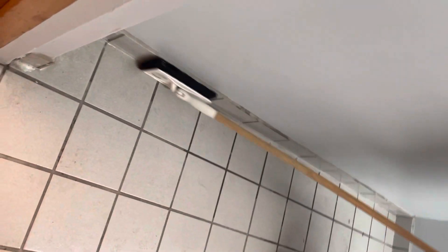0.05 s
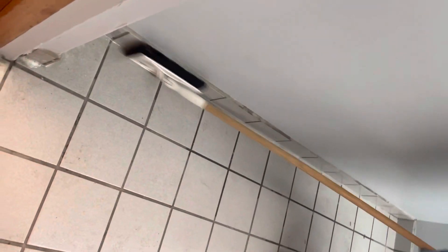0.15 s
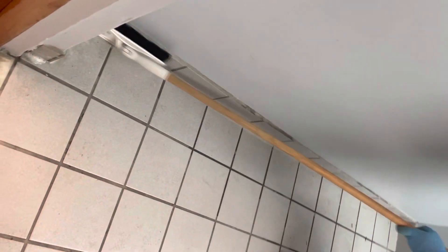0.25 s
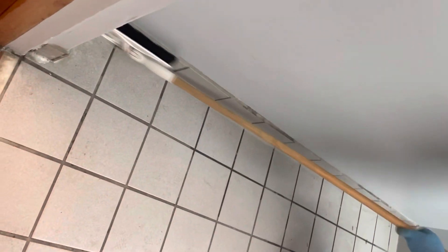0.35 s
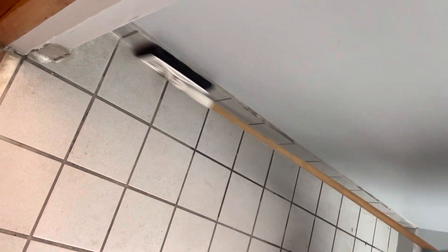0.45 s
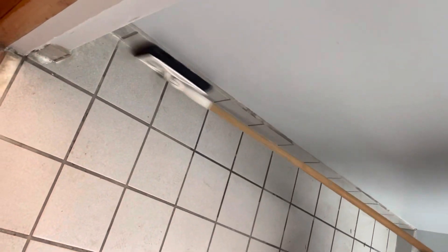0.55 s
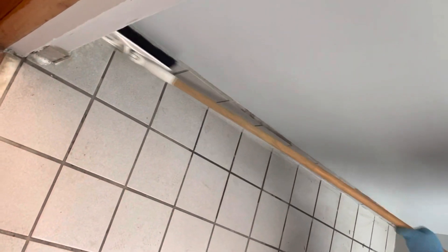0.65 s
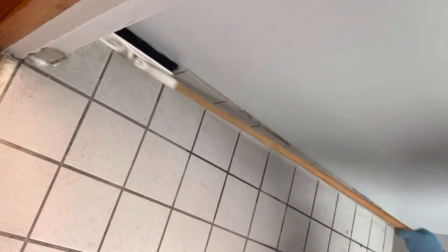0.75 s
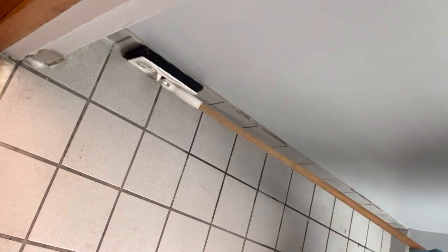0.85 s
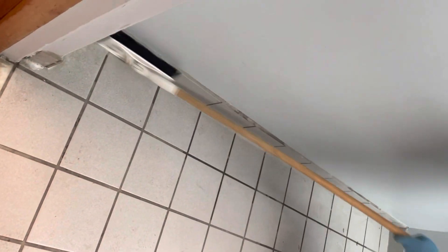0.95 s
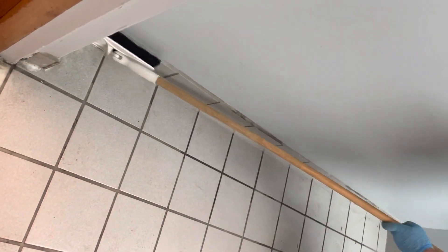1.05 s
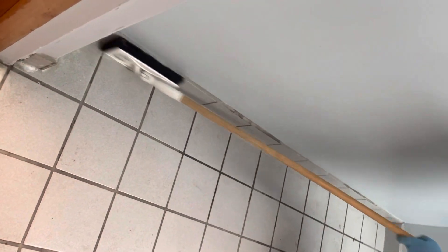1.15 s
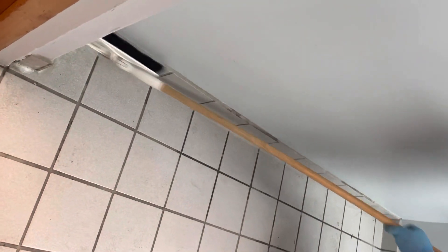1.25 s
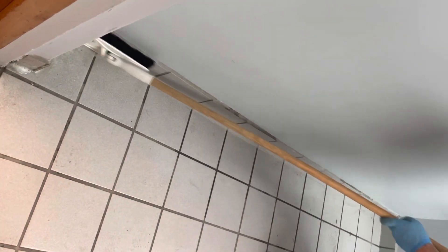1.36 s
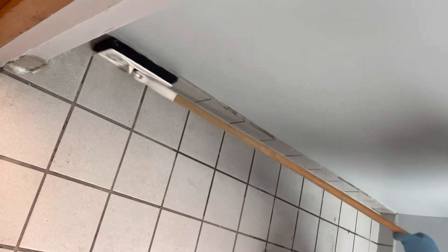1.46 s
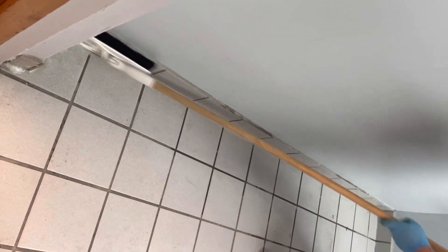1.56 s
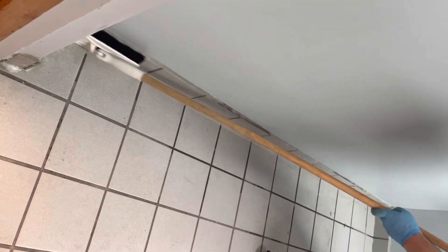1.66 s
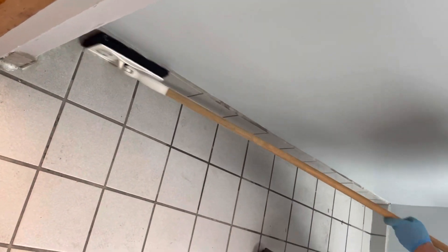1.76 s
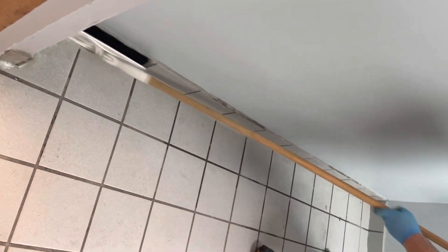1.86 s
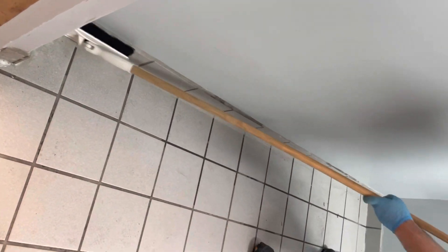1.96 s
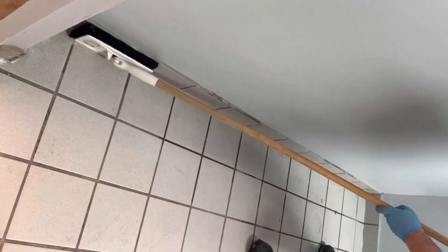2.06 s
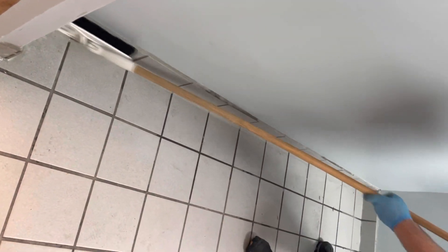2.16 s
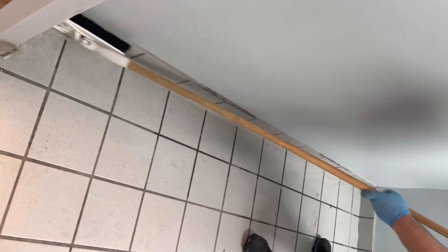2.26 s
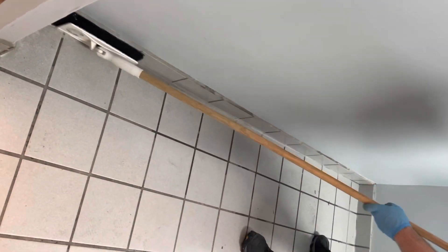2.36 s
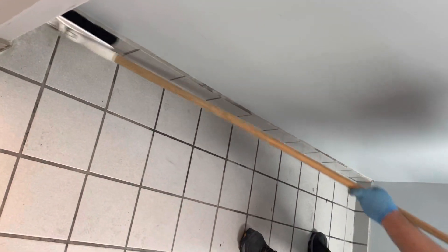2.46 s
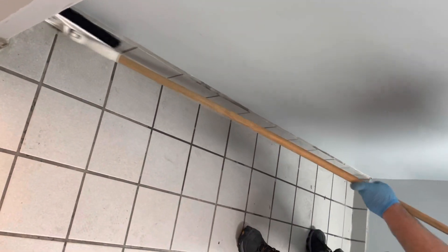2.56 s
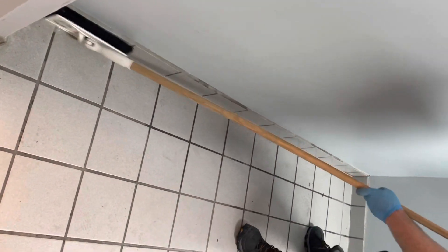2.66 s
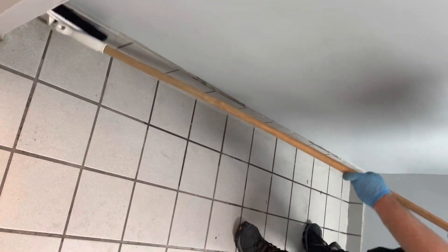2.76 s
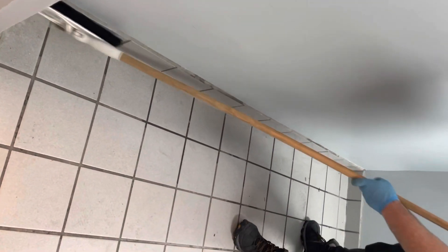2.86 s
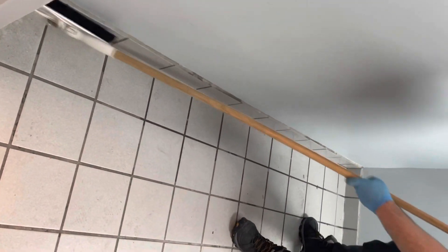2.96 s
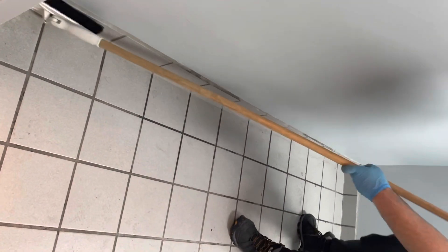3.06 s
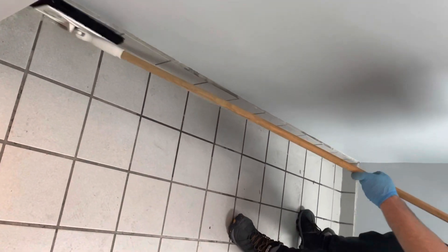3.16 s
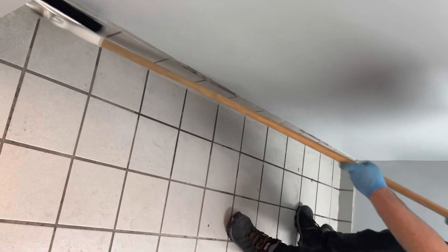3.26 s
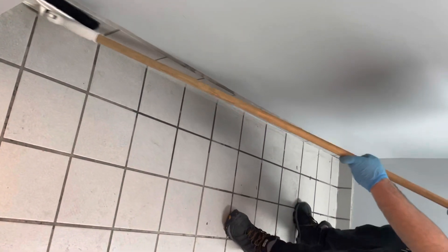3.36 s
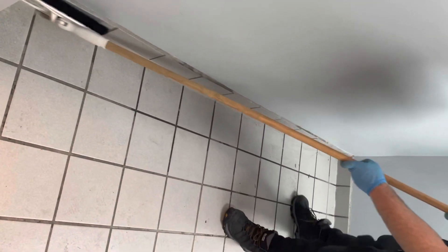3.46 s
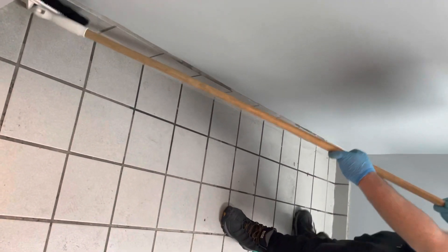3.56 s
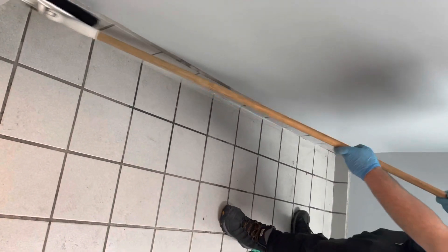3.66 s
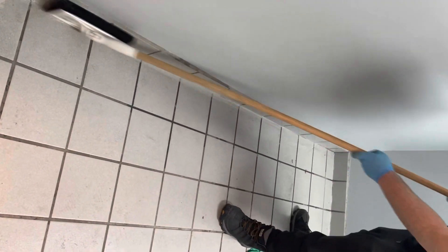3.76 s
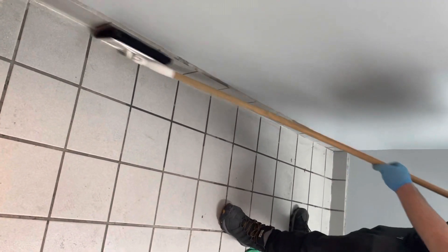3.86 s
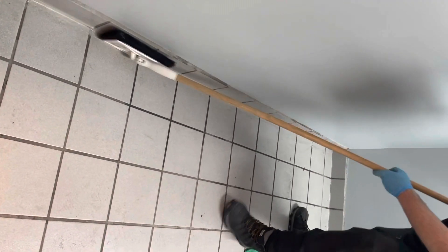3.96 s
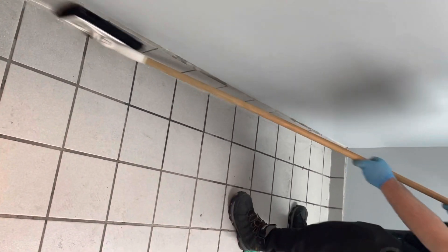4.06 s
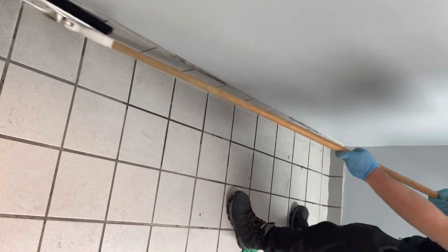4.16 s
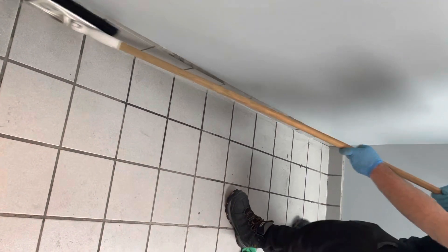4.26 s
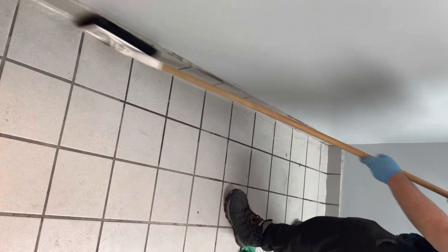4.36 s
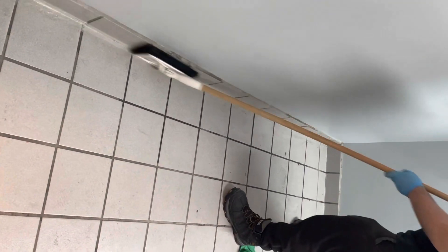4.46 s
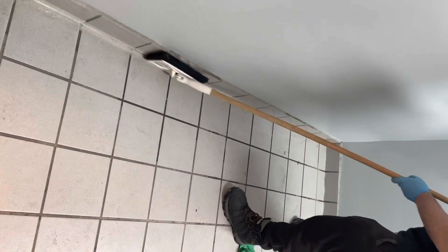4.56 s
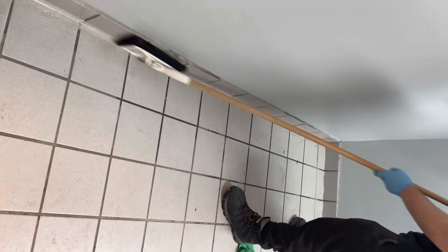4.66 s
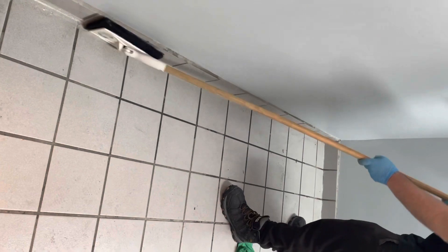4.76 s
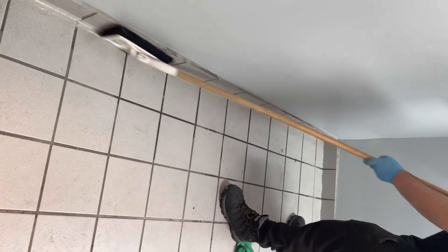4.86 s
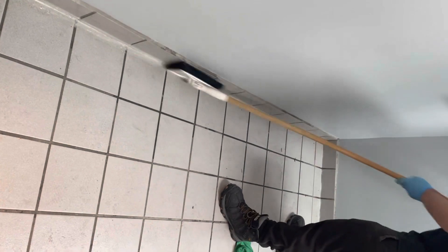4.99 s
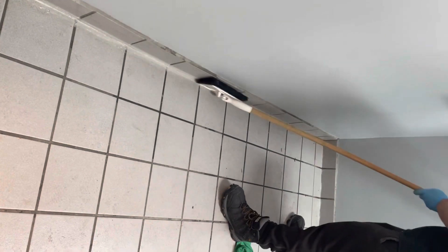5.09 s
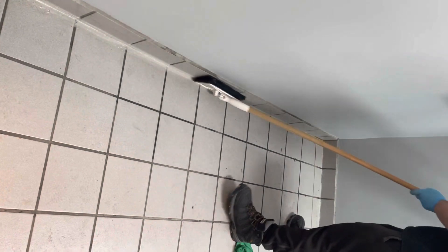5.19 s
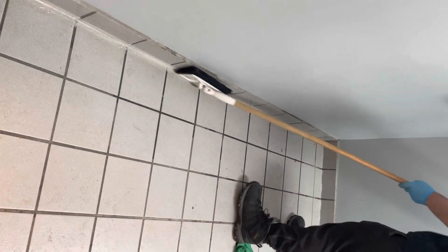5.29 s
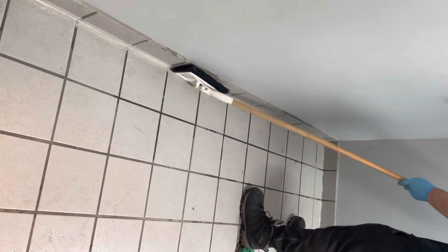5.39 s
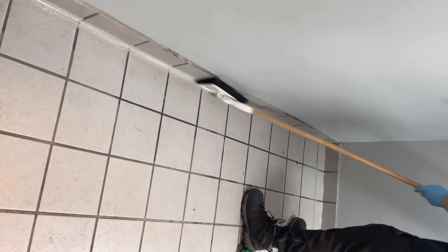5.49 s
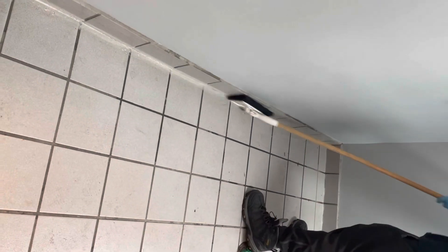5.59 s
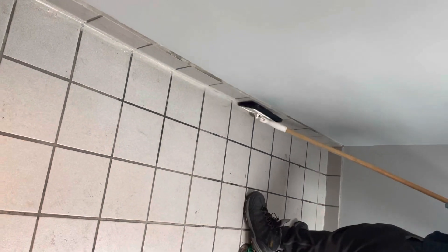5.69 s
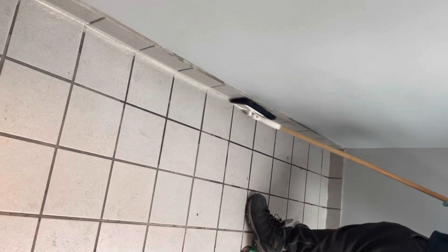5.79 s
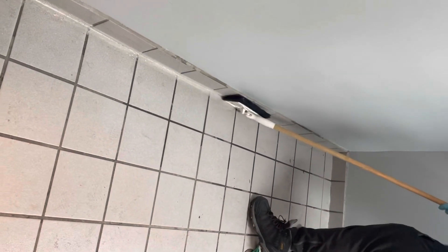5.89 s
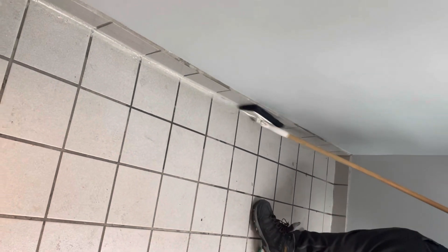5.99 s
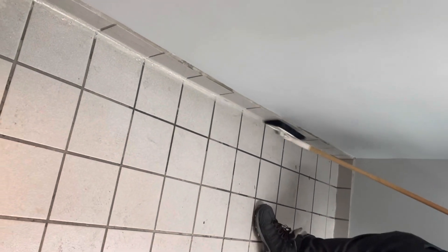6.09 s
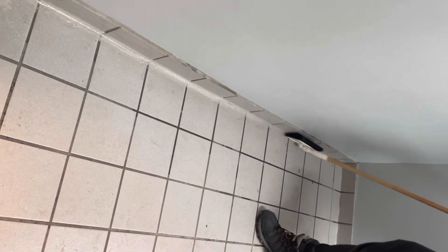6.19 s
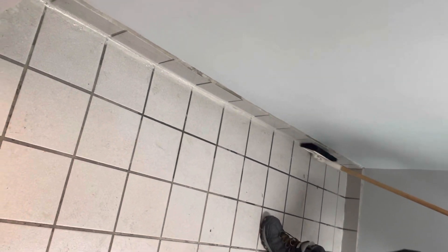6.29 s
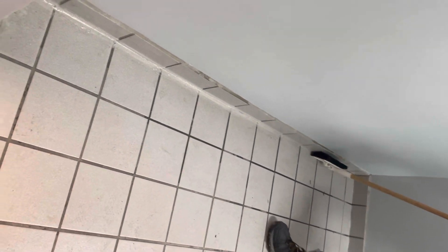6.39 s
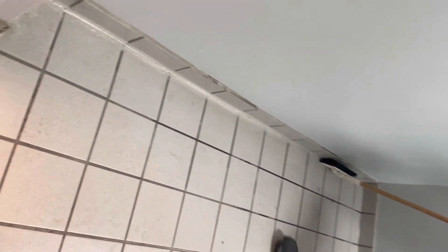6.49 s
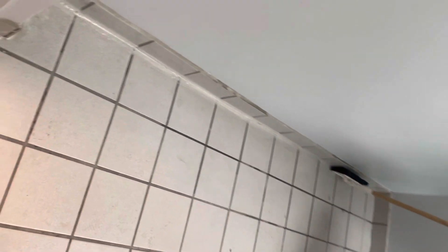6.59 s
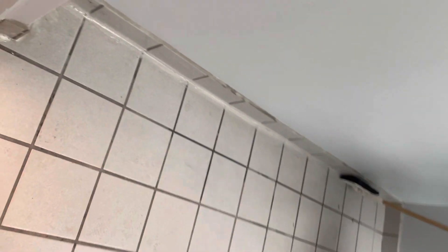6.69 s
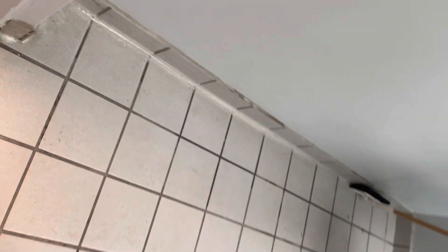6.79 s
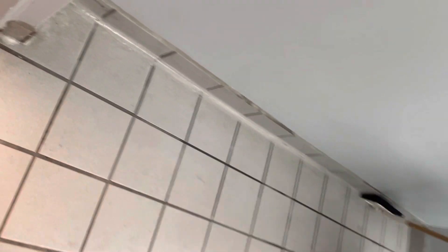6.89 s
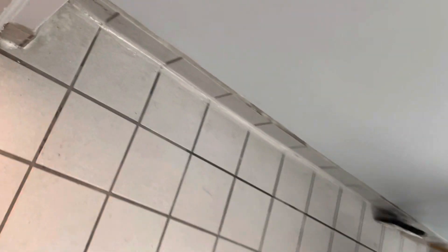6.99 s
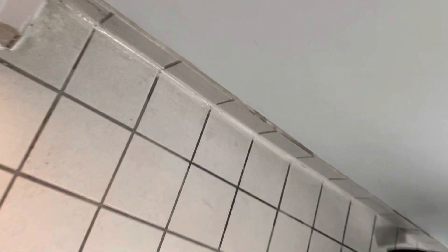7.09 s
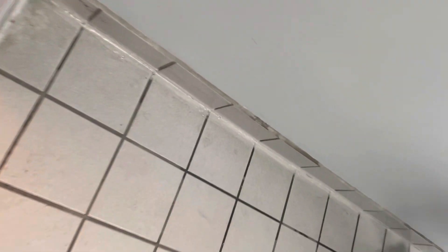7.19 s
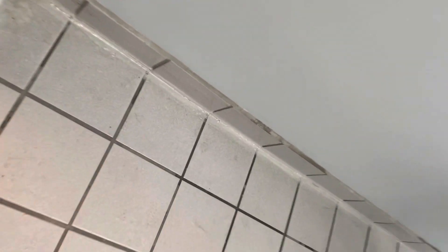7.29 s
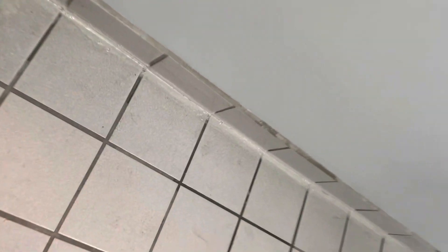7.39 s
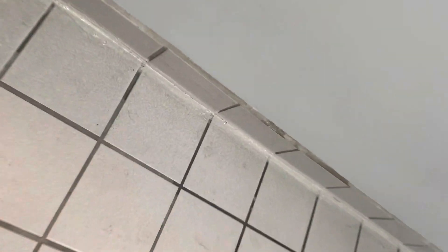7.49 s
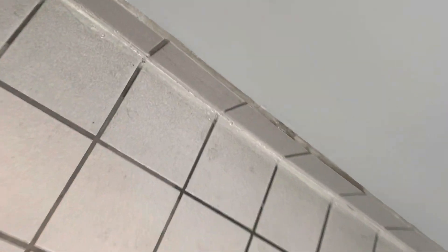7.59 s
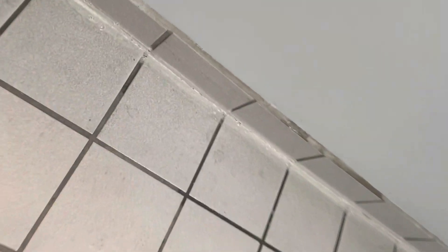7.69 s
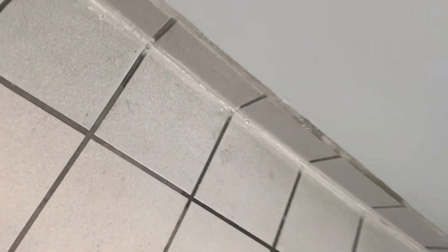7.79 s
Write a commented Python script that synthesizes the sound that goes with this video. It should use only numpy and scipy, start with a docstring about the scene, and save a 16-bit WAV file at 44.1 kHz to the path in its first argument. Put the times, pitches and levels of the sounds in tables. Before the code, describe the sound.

Rapid scratchy bristle strokes and hollow plastic knocks along a tiled wall, ringing briefly in a hard room, then stopping over a low airy hum.

```python
"""Scrubbing a tiled wall

A stiff brush on a long handle scrubs grout: bristle clicks make the scratching, and each slip also rings
the head and handle. The hard head knocks against the skirting; filtered bursts give each blow a hollow
knock, a clack, a tick and a low thud. The bare room answers with tile echoes and fading tails.
Underneath lie a steady rush of ventilation made from noise, a wavering hum and a low rumble."""
import sys
import numpy as np
from scipy import signal
from scipy.fft import rfft, irfft, next_fast_len
from scipy.io import wavfile
from scipy.ndimage import uniform_filter1d

SR = 44100
rng = np.random.default_rng(int(sys.argv[2]) if len(sys.argv) > 2 else 0)


def pcm_store(signal):
    """Save signal as 16-bit PCM."""
    levels = np.round(np.clip(np.atleast_2d(signal), -1, 1) * 32767)
    wavfile.write(sys.argv[1], SR, levels.astype(np.int16).T)


N = 345744  # length in samples

# Colour of the steady rush of air: (frequency [Hz], relative level per Hz [dB])
AIR_COLOUR = [(15, -43), (25, -19.5), (80, -1), (133, -5), (160, -3.5), (240, -10), (400, -11),
              (700, -11.5), (1100, -21.5), (2000, -26.5), (4000, -30), (8000, -35.5), (16000, -42.5)]
AIR_DB = -47
HUM_HZ, HUM_DB = 241.5, -58.5  # the pitch wavers around this
# Low rumble, which swells near the end: (time [s], level before its random wander [dB])
RUMBLE_LEVEL = [(0, -55), (1.2, -53.5), (1.7, -54), (1.9, -51), (2.1, -59), (2.5, -49), (2.9, -49),
                (3.3, -65), (6.8, -60), (7.2, -64), (7.3, -44), (7.47, -50), (7.58, -40.5), (7.68, -48),
                (7.84, -45)]
RUMBLE_WANDERS_DB = 2

# Swells of hiss and drag: strokes, and the room's wash after some blows:
# (loudest moment [s], rise time [s], fall time [s], bristle hiss [dB], drag through head [dB])
SWELLS = [(0, .1, 0.042, -34, -27), (0.191, 0.15, 0.14, -31.5, -34), (.41, 0.19, 0.18, -36, -37),
          (.59, 0.11, 0.077, -33, -38), (.81, 0.22, 0.035, -38, -42), (.93, 0.029, 0.082, -34.5, -32.5),
          (.9, .06, 0.024, -37, -44), (1.141, 0.18, 0.079, -38.5, -33.5), (1.244, 0.065, 0.094, -34.5, -31),
          (1.44, 0.11, 0.084, -39, -31.5), (1.55, 0.084, 0.12, -40, -38.5), (1.77, 0.083, 0.016, -42, -37),
          (1.879, 0.24, 0.068, -37.5, -37.5), (2.05, 0.039, 0.077, -48, -30.5),
          (2.179, 0.82, 0.03, -38.5, -37), (2.362, 0.033, 0.11, -50, -32), (2.51, 1, 0.03, -38.5, -44.5),
          (2.63, 0.21, 0.086, -40, -39.5), (2.77, 0.13, 0.093, -34, -43.5), (2.9, 0.083, 0.09, -36, -39),
          (3.01, 0.19, 0.15, -38, -47.5), (3.189, 0.022, 0.12, -32, -33), (3.36, 0.59, 0.06, -43, -46),
          (3.48, 0.015, 0.019, -24.5, -30), (3.56, 0.23, 0.11, -61, -38), (3.84, 0.46, 0.17, -36, -38),
          (4.04, 0.19, 0.43, -43, -33.5), (4.37, 0.034, 0.15, -34.5, -30.5),
          (4.52, 0.56, 0.021, -36, -37.5), (4.671, 0.22, 0.17, -36.5, -42), (5.01, 0.18, 0.17, -31.5, -32),
          (5.26, 0.32, 0.3, -42, -43), (5.6, 0.23, 0.12, -31, -45), (5.83, 0.22, 0.08, -36.5, -38),
          (6.02, 0.12, 0.15, -35, -46), (6.112, 0.036, 0.1, -26, -31.5), (6.27, 0.35, 0.16, -38, -30.5),
          (6.899, 0.08, 0.29, -55.5, -56.5), (7.56, 0.017, 0.29, -59, -49.5)]
TURN_DB, DRAG_TURN_DB = -14.5, -19.5  # change of hiss and drag one rise or fall time from the loudest moment
# Colour of the bristle hiss: (frequency [Hz], relative level [dB])
BRISTLE_COLOUR = [(300, -2.5), (1000, 13), (2500, 0.5), (4500, 0), (7000, 3.5), (10000, -0.5), (13000, 0.5),
                  (16000, 0.5)]
# Resonances (modes) of the brush head and handle: (frequency [Hz], width [Hz], starting level [dB])
HEAD_MODES = [(197, 43, -2), (308.8, 21.6, -3.5), (375.5, 33, -3.5), (609, 276, -1), (870, 165, 3.5),
              (1070, 137, 2.5), (1334, 540, -3), (1600, 620, -9.5), (1910, 210, -2.5), (2205, 310, -3.5),
              (2555, 600, -6), (2986, 270, -6.5), (3502, 370, -1), (3930, 400, -3), (4340, 360, -4.5),
              (4880, 100, -23), (5090, 120, -5), (5300, 175, -3), (5680, 250, -6), (6470, 200, -1)]
SHIFTS_PER_S, SHIFT_DB = 9, 4  # how often and how strongly the modes of the drag wander
# Boost of the drag's hollow modes: (time [s], change at the centre of the band [dB])
HOLLOW_BOOST = [(0, 11), (1.2, -2), (2, 2.5), (3.5, 3.5), (4.5, 2.5), (5.5, 0), (7.84, -2)]
HOLLOW_HZ = 600
# Brightness of the drag: (time [s], amount its upper part is raised and its lower part cut [dB])
DRAG_BRIGHTNESS = [(0, 3), (1.3, -2.5), (2, -2), (3.5, 1.5), (4.2, -2), (5, 0), (6.3, -4), (7.84, 4.5)]
BRIGHT_HZ = 1300  # where upper and lower part meet
SHAKE_DB, SHAKE_FOLLOWS = -39, 0.37  # handle shake: level, and power of the drag gain that it follows
POSE_DB, POSE_HZ = (-5, -11), (101, 249)  # drag ringing at the latest knock and clack pitch: levels, widths
POSE_FADES_DB_PER_S = 56  # as the head slides away from where it landed

# Blows of the brush head, with two strong early echoes (2.046 and 3.476 s):
# (time [s], hollow knock level [dB], knock pitch [Hz], how far it rings out [dB],
# clack level [dB], clack pitch [Hz], how far it rings out [dB], clack breadth [octaves],
# sharp tick level [dB], share heard directly [dB])
BLOWS = [(.007,-46,714,12,-29,1910,10,0.33,-36.5,-2), (.018,-47,990,-4,-35,1950,6,0.25,-59,5),
         (0.136,-37,1090,-15,-30,1870,1,0.78,-48,1.5), (.179,-21,915,-2,-24,1910,10,1,-40,-1),
         (0.343,-37,980,1,-41,2330,-18,0.54,-48,-3), (.396,-52,870,-14,-30.5,1910,7,0.17,-51,-2),
         (0.454,-38,724,25,-32.5,1960,-3,0.68,-46,0.5), (.535,-32.5,790,-12,-26.5,2200,5,0.55,-36,-4.5),
         (.585,-21,860,4,-22.5,2190,3,0.61,-36.5,-3.5), (0.75,-41,840,-8,-41,1910,-1,0.47,-49,0),
         (0.785,-55,1060,-2,-36.5,1910,7,0.14,-42,-1), (.914,-21.5,897,6,-27,2140,-12,0.52,-36.5,-3.5),
         (1.106,-47,960,-7,-42,2260,8,0.17,-58,2), (1.135,-43,2080,-7,-37,3520,4,0.1,-44,5),
         (1.227,-26,880,-10,-31.5,2210,-12,0.58,-38,-1.5), (1.416,-40,1070,-2,-36,1910,-16,0.14,-60,-4),
         (1.434,-44,1475,-8,-35.5,2730,9,0.23,-42,4), (1.453,-59,1026,-6,-36.5,2170,-3,0.64,-63,1),
         (1.517,-29,900,-23,-30,1900,-22,0.51,-40,-5), (1.715,-37.5,1080,-1,-36.5,2360,5,0.29,-47,-1),
         (1.759,-50,1950,9,-47,4440,0,0.53,-40.5,2.5), (1.831,-32.5,944,-13,-31,2300,-13,0.47,-38.5,-3.5),
         (2.035,-38.5,1365,4,-24.5,2640,-7,0.19,-37.5,0.5), (2.046,-47,1370,0,-41,2850,2,0.33,-55,1),
         (2.346,-35.5,1413,-3,-27,2790,1,0.35,-34.5,2), (2.489,-59,827,-10,-57,2530,-11,0.36,-44,0),
         (2.611,-34.5,1350,6,-35,2470,4,0.45,-49,-0.5), (2.623,-55,1300,0,-37.5,2880,20,0.11,-58,-1),
         (2.75,-49,756,-6,-57,3480,2,.5,-40.5,0.5), (2.761,-56,870,-4,-47,1990,6,0.33,-48,5),
         (2.848,-34.5,804,0,-32.5,1780,-6,0.47,-53,-3), (2.89,-41,797,-2,-30,2200,-14,0.56,-50,0.5),
         (2.902,-54,785,-2,-39,2950,12,0.11,-58,-8), (3.019,-36.5,1000,-9,-58,2420,1,.5,-55,-21),
         (3.118,-30.5,1010,-15,-28.5,1920,-17,0.48,-40,-6),
         (3.171,-34,1113,-15,-22.5,2820,-12,0.37,-29,2.5), (3.438,-32,1060,-12,-24,1910,1,0.42,-36,-2.5),
         (3.464,-24,1710,-4,-21.5,3190,-12,0.17,-20.5,-1), (3.476,-36,1920,-6,-28,3420,-8,0.22,-49,1.5),
         (3.799,-40,805,11,-39,1920,-2,0.59,-46,2.5), (3.842,-25.5,775,-1,-23,1960,4,0.64,-39.5,-4.5),
         (3.846,-28,800,1,-33.5,1350,2,0.38,-36,-0.5), (4.02,-29.5,1150,-4,-27.5,1980,-1,0.44,-39.5,-3),
         (4.034,-39,1094,-6,-30,2500,11,0.52,-36.5,0), (4.297,-42,845,0,-31.5,1800,11,0.31,-58,-11),
         (4.369,-33,773,24,-20.5,1600,8.5,0.56,-28.5,0), (4.864,-51,813,4,-40,1600,4,0.51,-43,-13),
         (4.997,-32,1025,15,-34,2000,7,0.84,-37.5,5), (5.002,-19.5,840,4,-23,2025,5,0.55,-44,-4),
         (5.069,-23.5,1063,11,-39,1850,-6,0.83,-48,-10), (5.235,-47,840,-6,-49,2170,-8,0.62,-44,-7),
         (5.321,-39,262,-7,-48,1300,-2,0.3,-62,3.5), (5.35,-52,333,-10,-45.5,580,0,0.39,-65,2),
         (5.532,-35.5,1040,5,-38,2120,11,0.25,-46,-1.5), (5.609,-23.5,880,7,-29,2200,5,0.53,-39,-2),
         (5.808,-23,1017,17.5,-31,2080,-1,0.62,-48,-2.5), (5.995,-23.5,840,13,-31,2060,14,0.59,-42,-4),
         (6.1,-23.5,843,-2,-23.5,2080,7,0.48,-47,-3.5), (6.108,-38,780,-13,-29,2060,2,0.81,-18.5,-3),
         (6.12,-42,1040,-4,-48,2100,0,0.61,-40,-9), (6.224,-34,822,-11,-31,2080,9,0.29,-48,4),
         (6.893,-57,674,-6,-74,2200,-6,0.5,-53.5,-2), (7.518,-53,800,-8,-59,2500,0,.4,-59,-3),
         (7.535,-38.5,1990,3,-42,3860,-17,0.61,-46,-0.5), (7.538,-36,750,9,-38,1230,5,0.41,-53,3),
         (7.569,-41.5,536,12,-63,2000,4,.58,-63,-4)]
BLOW_S = .02  # seconds of sound over which the levels of a blow are reckoned
KNOCK_RING_HZ, CLACK_RING_HZ = 61, 97.5  # widths of the ringing pitches
KNOCK_OCT = 0.43  # breadth of the hollow knock
# How long a blow lasts, more glancing further off: (time [s], mean lateness of its parts [ms])
BLOW_SPREAD = [(0, 1.464), (1.8, 1.15), (3.6, 1.205), (4.4, 1.55), (5, 2.5), (6.3, 2.81), (7.84, 1.53)]
# Colour of the tick: (frequency [Hz], relative level [dB])
TICK_COLOUR = [(3000, -12), (4500, -6.5), (5500, -2), (11000, -2.5), (16000, -6.5)]
# Low thud in each blow: (time [s], level against the hollow knock [dB])
THUD_LEVEL = [(0, -13.5), (1.2, -9.5), (2, -0.5), (3, -19.5), (4.3, -7), (5, -18), (6.3, -24), (7.5, -11)]
THUD_HZ, THUD_OCT = 346, 0.77
CLARITY = 0.31  # how far the modes of a blow stand apart
UNEVEN_DB = 3  # each blow favours some bands of the crack by chance

# Dying away of the room: (frequency [Hz], time to fall by 60 dB [s])
ROOM_FADE = [(250, 0.7), (1000, 0.98), (3000, 0.79), (8000, 0.68), (14000, 0.25)]
ROOM_DB = 2
# Echoes from near tiles: (delay [s], level [dB])
TILE_ECHOES = [(.0065, -15.5), (.0112, -6), (0.018, -12), (0.02, -13.5)]
# Colour of the sound sent to the room: (frequency [Hz], level [dB])
WALL_COLOUR = [(250, -1.5), (1000, -3.5), (3000, -2.5), (6000, -4.5), (14000, 1.5)]

# Likeness of the two microphone ports: (frequency [Hz], likeness [0 to 1])
PORT_LIKENESS = [(60, 0.99), (300, 1), (700, 0.49), (3000, 0.6), (5500, 0.51), (7400, 1), (9000, 0.61),
                 (12500, 1), (14500, 0.64)]
# How far the left port leads: (frequency [Hz], phase [radians])
LEFT_LEAD = [(0, 0), (2500, .7), (4400, .8), (4900, 0), (7000, 3.1), (8200, 3.2), (10400, 6.25),
             (11600, 6.3), (13200, 9), (15100, 9.6), (15800, 10.2)]
# Balance of the ports: (frequency [Hz], left minus right [dB])
LEFT_LEAN = [(40, 0.5), (150, -2), (380, -6), (950, -5), (2400, 0), (15000, 0.5)]
EDGE_HZ = 16150  # top of the band that is kept


def gain_of(db):
    """Turns decibels into a plain multiplier."""
    return 10 ** (np.asarray(db) / 20)


def evened(x):
    """Scales a signal to an average strength (RMS) of 1."""
    return x / np.sqrt(np.mean(x ** 2, axis=-1, keepdims=True) + 1e-20)


def read(points, hz):
    """Reads a table between its points, on a logarithmic pitch scale."""
    f, value = np.transpose(points)
    return np.interp(np.log(hz + 1), np.log(f + 1), value)


def curve(rows, order):
    """Draws one table column as a line through time."""
    rows = np.array(rows)
    return np.interp(np.arange(N) / SR, rows[:, 0], rows[:, order])


def coloured(x, response):
    """Filters along the last axis by a function of frequency."""
    size = next_fast_len(x.shape[-1] + 4096)
    spectrum = rfft(x, size) * response(np.fft.rfftfreq(size, 1 / SR))
    return irfft(spectrum, size)[..., :x.shape[-1]]


def mode(hz, centre_hz, width):
    """One resonance, with a gain of 1 at its centre."""
    return 1j * hz * width / (centre_hz ** 2 - hz * hz + 1j * hz * width)


def hump(hz, centre_hz, octaves):
    """A rounded band of colour around one frequency."""
    return np.exp(-(np.log2(hz / centre_hz + 1e-9) / octaves) ** 2 / 2)


def ventilation():
    """Noise gives a steady low rush and a rumble that comes and goes; a sine gives the wavering motor hum."""
    rush = evened(coloured(rng.standard_normal((2, N)), lambda hz: gain_of(read(AIR_COLOUR, hz))))
    drift = evened(uniform_filter1d(rng.standard_normal(N), 6000))
    hum = np.sqrt(2) * np.sin(2 * np.pi * np.cumsum(HUM_HZ + 0.82 * drift) / SR)
    rumble = evened(coloured(rng.standard_normal(N),
                             lambda hz: np.exp(-(np.log(hz / 85 + 1e-9) / 0.71) ** 2)))
    wander = uniform_filter1d(rng.standard_normal(N), size=4000)
    wander = evened(uniform_filter1d(wander, size=4000))
    rumble *= gain_of(curve(RUMBLE_LEVEL, order=1) + RUMBLE_WANDERS_DB * wander)
    return gain_of(AIR_DB) * rush + gain_of(HUM_DB) * hum + rumble


def swells():
    """Strokes, and the room's wash after some blows, rise and fade; returns the gains of hiss and drag."""
    t = np.arange(0, N + 64, 64) / SR  # one point every 64 samples is enough
    power = 1e-14
    for s, rise_s, fall_s, *levels_db in SWELLS:
        away = np.where(t < s, (s - t) / rise_s, (t - s) / fall_s)
        swell_db = np.array(levels_db)[:, None] + np.outer([TURN_DB, DRAG_TURN_DB], away)
        power = power + gain_of(swell_db) ** 2
    return [np.interp(np.arange(N) / SR, t, np.sqrt(p)) for p in power]


def scratch(per_s, spread_db):
    """Bristle tips slip over the grit: a dense train of clicks, a few large."""
    size_db = spread_db * np.minimum(rng.exponential(1, N), 3.5)
    size = gain_of(size_db) * rng.choice([-1., 1.], N)
    return evened(size * (rng.random(N) < per_s / SR))


def catches(per_s, spread_db, tilt):
    """Tufts catch on the grout and let go; each catch rings one mode of the head or handle."""
    slips = scratch(per_s, spread_db)
    which = rng.integers(0, len(HEAD_MODES), N)  # the mode that each slip rings
    # the strength of each mode wanders at random, so the drag's colour shifts
    shifts = rng.standard_normal((len(HEAD_MODES), round(N / SR * SHIFTS_PER_S) + 2))
    place = np.arange(N) / SR * SHIFTS_PER_S
    low = place.astype(int)
    part = place - low
    favour_db = SHIFT_DB * (shifts[which, low] * (1 - part) + shifts[which, low + 1] * part)
    hollow_db = curve(HOLLOW_BOOST, order=1) * hump(np.array(HEAD_MODES)[which, 0], HOLLOW_HZ, 0.18)
    slips = slips * gain_of(favour_db + hollow_db)
    size = next_fast_len(N + 4096)
    hz = np.fft.rfftfreq(size, 1 / SR)
    spectrum = 0
    for k, (f, width, db) in enumerate(HEAD_MODES):
        own_slips = rfft(slips * (which == k), size)
        spectrum = spectrum + gain_of(db) * tilt(f) * own_slips * mode(hz, f, width) ** 2
    return evened(irfft(spectrum, size)[:N])


def posed(slips):
    """The head stays as it last landed, so the slips ring its knock and clack pitches."""
    rows = np.array(BLOWS)
    t = np.arange(N) / SR
    latest = np.maximum(np.searchsorted(rows[:, 0], t) - 1, 0)
    out = 0
    for hz, db, width in zip(rows[latest][:, [2, 5]].T, POSE_DB, POSE_HZ):
        # shift the pitch down to zero, smooth, and shift back: a resonance that can move
        turn = np.exp(2j * np.pi * np.cumsum(hz) / SR)
        r = np.exp(-np.pi * width / SR)
        ringing = turn * signal.lfilter([1], [1, -2 * r, r * r], slips / turn)
        out = out + gain_of(db) * evened(ringing.real)
    since_s = np.maximum(t - rows[latest, 0], 0)
    return out * gain_of(-POSE_FADES_DB_PER_S * since_s)


def bristles():
    """The tips hiss in the air; their drag shakes the head and, lower down, the handle."""
    hiss = evened(coloured(scratch(6000, 0.79), lambda hz: gain_of(read(BRISTLE_COLOUR, hz))))
    drag = catches(1000, 1.9, lambda hz: (hz / (hz + 700)) ** 2 / (1 + (hz / 2700) ** 4))
    shake = catches(900, 0.68, lambda hz: 1 / (1 + (hz / 450) ** 4))
    upper = coloured(drag, lambda hz: 1 / (1 + (BRIGHT_HZ / (hz + 1)) ** 6))
    bright = gain_of(curve(DRAG_BRIGHTNESS, order=1))
    drag = (drag - upper) / bright + upper * bright
    drag = drag + posed(scratch(600, 3.1))
    hissing, dragging = swells()
    shaking = gain_of(SHAKE_DB) * dragging ** SHAKE_FOLLOWS
    return hissing * hiss, dragging * drag + shaking * shake


def head(hz):
    """The modes of the brush head over a little unresonant sound."""
    return gain_of(-21) + sum(gain_of(db) * mode(hz, f, width) for f, width, db in HEAD_MODES)


def sudden(gain):
    """Gives a spectrum the phase of a sound that starts at once and only then rings."""
    folded = irfft(np.log(gain + 1e-4 * gain.max()))
    folded = folded * np.where(np.arange(len(folded)) < len(folded) // 2, 2, 0)
    folded[0] /= 2
    return np.exp(rfft(folded))


def knocks():
    """Each blow or early echo is a knock, clack, tick and thud; returns the direct sound and the room's share."""
    out = np.zeros((2, N + 4096))
    hz = np.fft.rfftfreq(4096, 1 / SR)
    dies = np.cos(np.linspace(0, np.pi / 2, 4096)) ** 2
    modes = head(hz)
    modes = modes * abs(modes) ** CLARITY
    shape = (len(BLOWS), len(hz))
    bands = evened(uniform_filter1d(rng.standard_normal(shape), size=24))
    uneven = gain_of(UNEVEN_DB * bands * (hz > 1500))
    chance = np.abs(evened(uniform_filter1d(rng.standard_normal(shape), 14)))
    for row, spread, lumps in zip(BLOWS, chance, uneven):
        s, low_db, low_hz, low_ring_db, high_db, high_hz, high_ring_db, breadth, tick_db, direct_db = row
        # parts of the head land a moment apart
        seconds = np.interp(s, *np.transpose(BLOW_SPREAD)) / 1000
        late = np.exp(-2j * np.pi * np.cumsum(spread ** 2 * seconds) * hz[1])
        body = modes * lumps
        body += gain_of(low_ring_db) * mode(hz, low_hz, KNOCK_RING_HZ)
        body += gain_of(high_ring_db) * mode(hz, high_hz, CLACK_RING_HZ)
        thud_db = low_db + np.interp(s, *np.transpose(THUD_LEVEL))
        parts = [(low_db, hump(hz, low_hz, KNOCK_OCT)),
                 (high_db, hump(hz, high_hz, max(breadth, .1))),
                 (tick_db, gain_of(read(TICK_COLOUR, hz)) * (hz > TICK_COLOUR[0][0])),
                 (thud_db, hump(hz, THUD_HZ, THUD_OCT))]
        blow = 0
        for db, shade in parts:
            burst = irfft(late * sudden(abs(body) * shade)) * dies
            blow = blow + gain_of(db) * evened(burst)
        blow *= np.sqrt(BLOW_S * SR / len(blow))
        start = round(s * SR)
        out[:, start:start + 4096] += gain_of([[direct_db], [0]]) * blow
    return out[:, :N]


def room(x):
    """A few tile echoes, then sparse taps dying band by band; three tails take turns at a steady rate."""
    taps = np.zeros((3, 2, SR))
    at = np.arange(340, SR - 20, 20) + rng.integers(0, 20, (3, 2, (SR - 341) // 20))
    np.put_along_axis(taps, at, rng.choice([-1., 1.], at.shape), 2)
    hz, t, z = signal.stft(taps, SR, nperseg=256)
    fade = gain_of(-60 * t / read(ROOM_FADE, hz)[:, None])
    tails = signal.istft(z * fade, SR, nperseg=256)[1]
    tails *= gain_of(ROOM_DB) / np.linalg.norm(tails, axis=2, keepdims=True)
    near = np.zeros((2, round(SR / 20)))
    for s, db in TILE_ECHOES:
        # each side hears the echo up to 11 samples late
        near[[0, 1], round(s * SR) + rng.integers(0, 12, 2)] = gain_of(db)
    # the shares of the tails turn steadily, so the room's colour keeps shifting
    turn = np.arange(N) / SR * 5.0 + np.arange(3)[:, None] * np.pi / 3
    shares = np.sqrt(2 / 3) * np.cos(turn)
    ringing = signal.fftconvolve((x * shares)[:, None], tails, axes=2).sum(0)[:, :N]
    echoes = signal.oaconvolve(x[None], near, axes=1)[:, :N]
    return ringing + echoes


def scene():
    """Adds the brush, the blows, the room's answer and the ventilation."""
    hiss, drag = bristles()
    direct, sent = knocks() + drag
    sent = sent + gain_of(-36.0) * hiss  # only a little hiss reaches the room
    sent = coloured(sent, lambda hz: gain_of(read(WALL_COLOUR, hz)))
    return hiss + direct + room(sent) + ventilation()


def record(dry):
    """Two close ports share most of the sound, the left one ahead in phase; then the band limit."""
    size = next_fast_len(N + 4096)
    hz = np.fft.rfftfreq(size, 1 / SR)
    left, other = rfft(dry, size)
    same = np.clip(read(PORT_LIKENESS, hz), 0, 1)
    right = same * left + np.sqrt(1 - same ** 2) * other
    # equal sensitivity of both ports
    right *= np.sqrt(uniform_filter1d(abs(left) ** 2, 4000) / uniform_filter1d(abs(right) ** 2, 4000))
    right *= np.exp(-1j * np.interp(hz, *np.transpose(LEFT_LEAD)))
    lean = gain_of(read(LEFT_LEAN, hz) / 2)  # half to each side
    ports = irfft(np.array([left * lean, right / lean]), size)[:, :N]
    ports = 1.1 * np.tanh(ports / 1.1)  # the loudest cracks are rounded off
    low_pass = signal.firwin(1023, EDGE_HZ, window=("kaiser", 9), fs=SR)
    return signal.oaconvolve(ports, low_pass[None], "same")


dry = scene()
out = record(dry)
pcm_store(out)
```